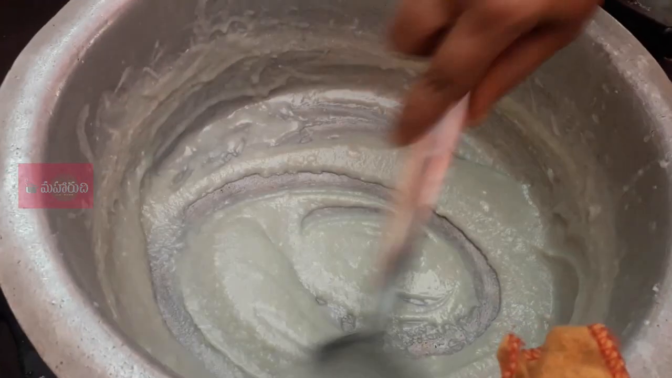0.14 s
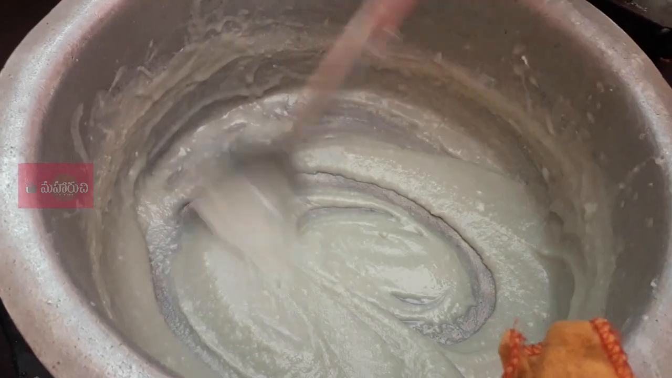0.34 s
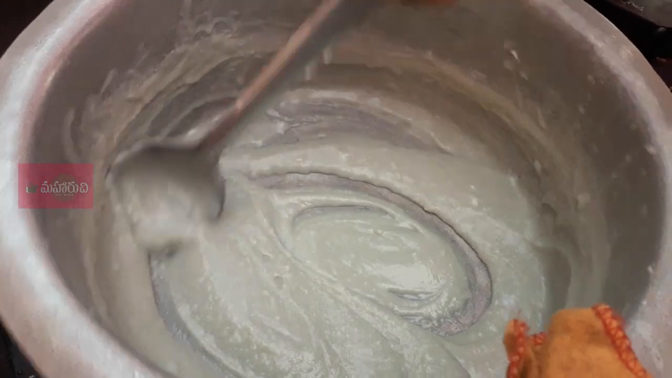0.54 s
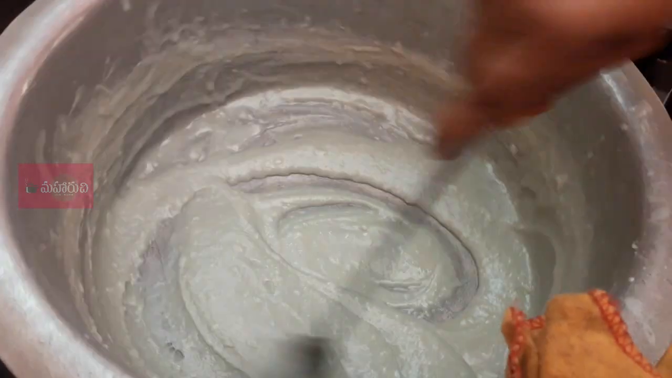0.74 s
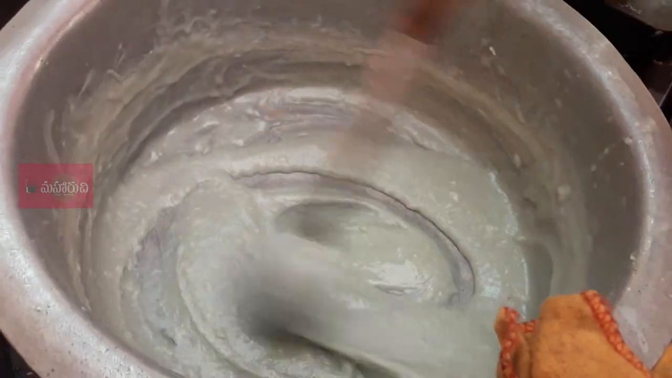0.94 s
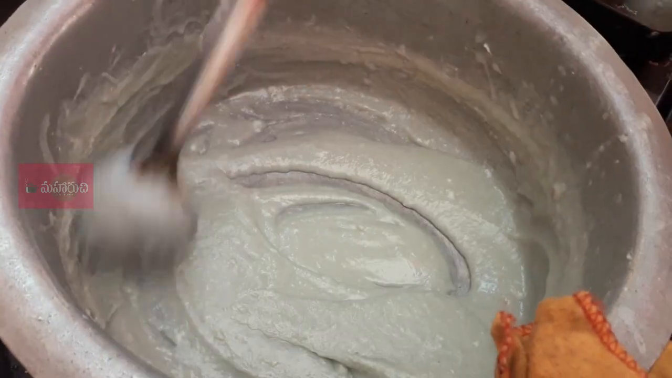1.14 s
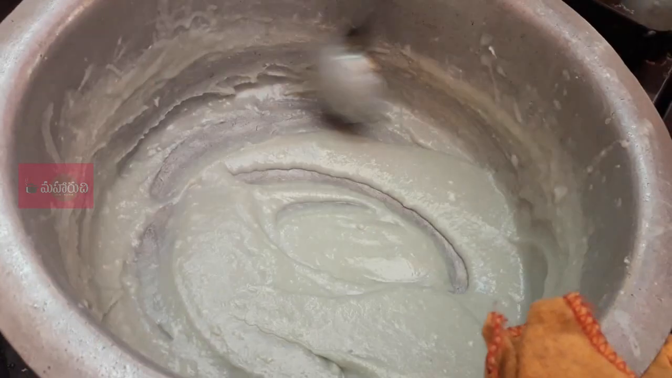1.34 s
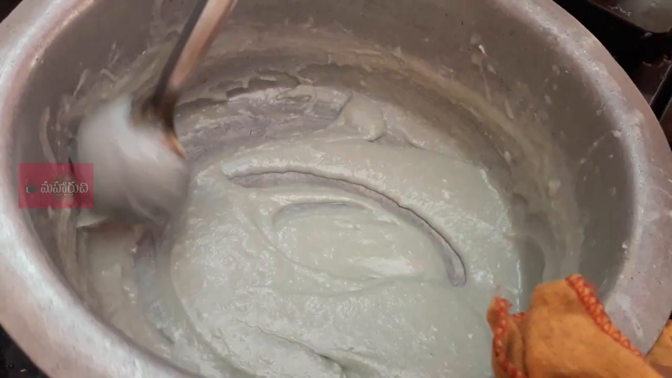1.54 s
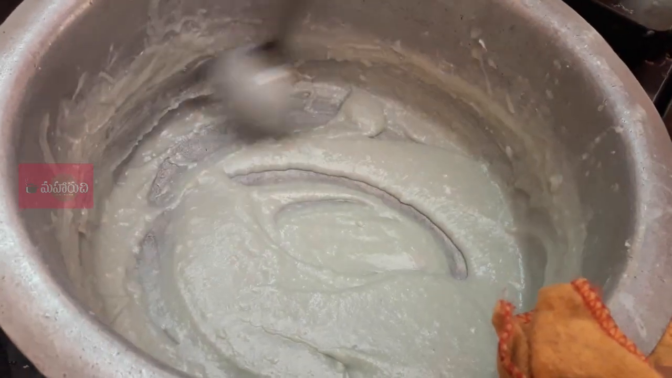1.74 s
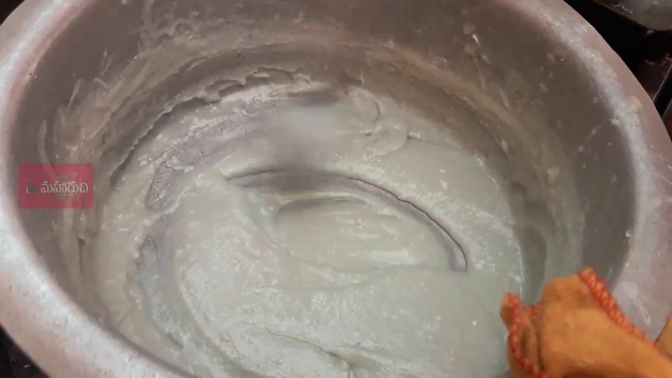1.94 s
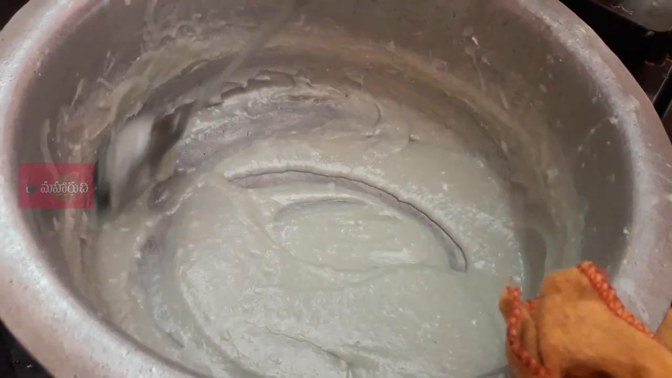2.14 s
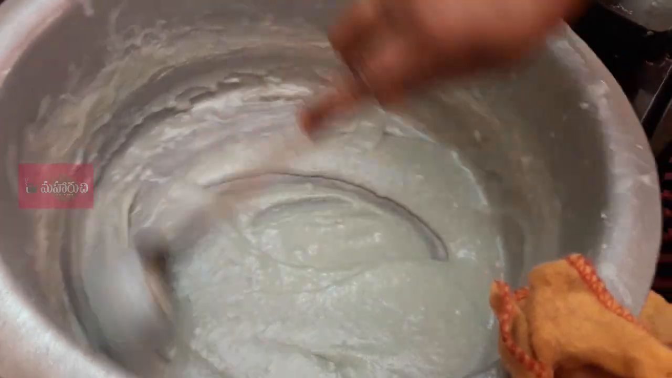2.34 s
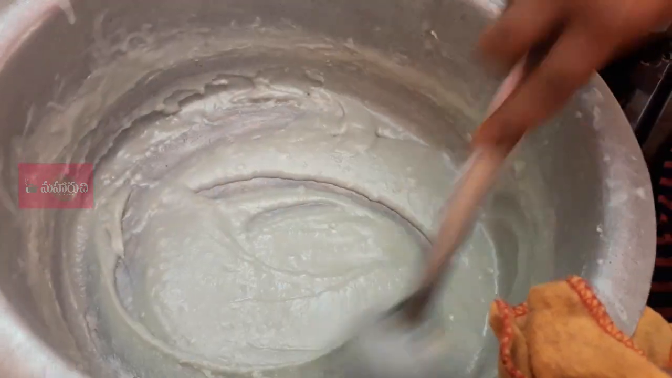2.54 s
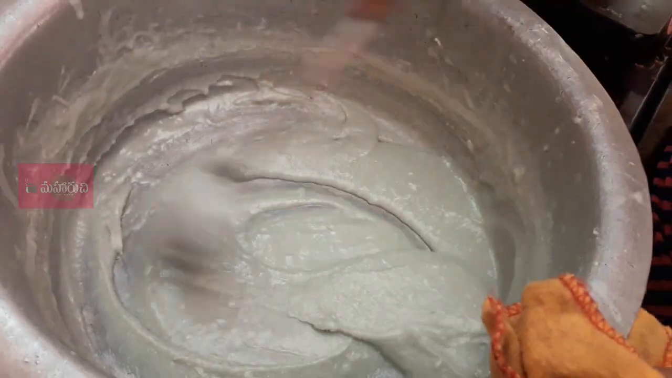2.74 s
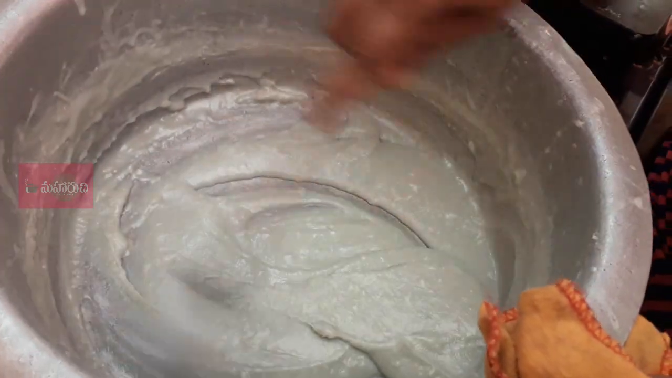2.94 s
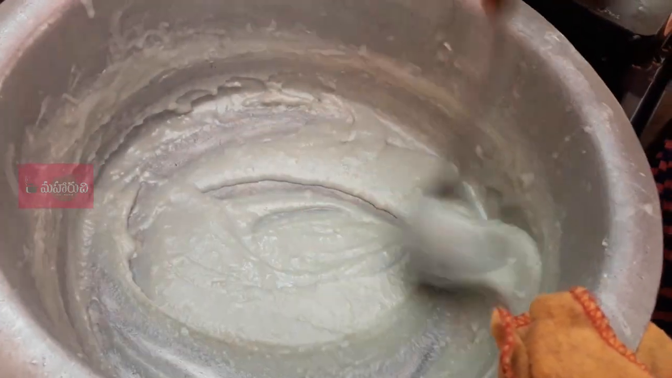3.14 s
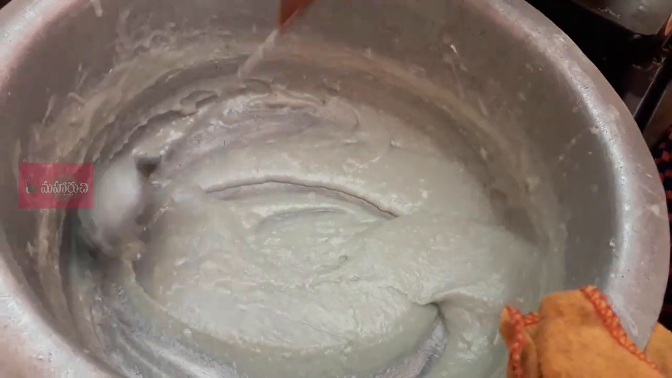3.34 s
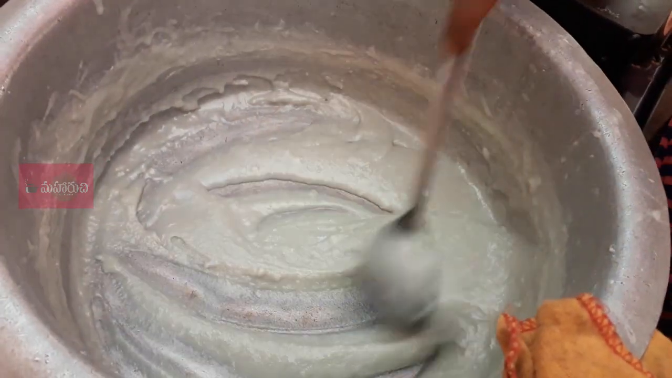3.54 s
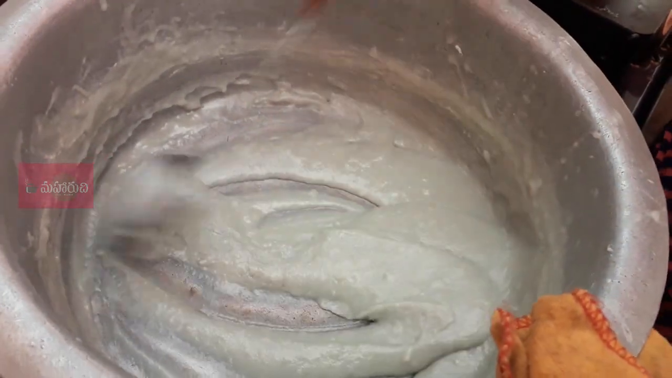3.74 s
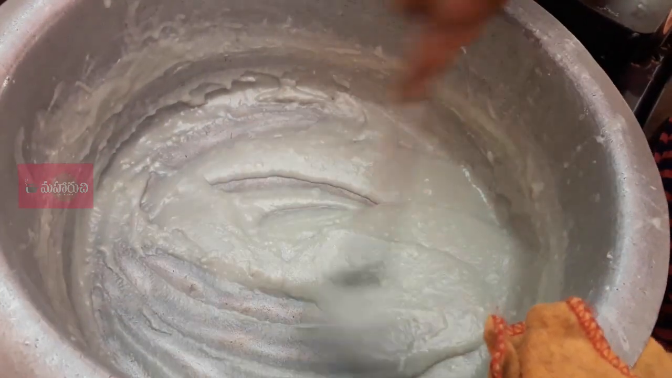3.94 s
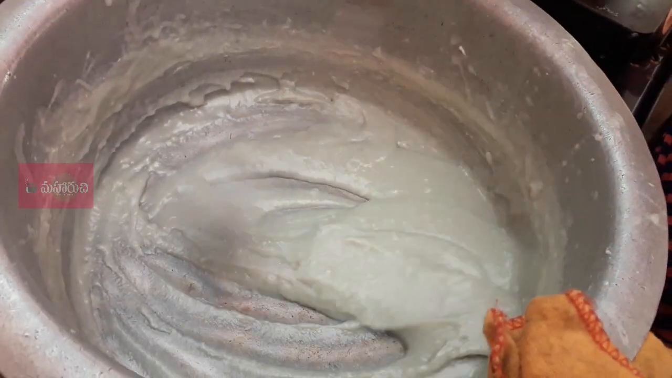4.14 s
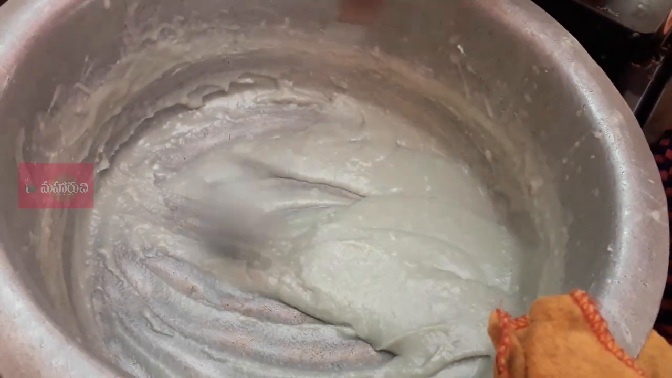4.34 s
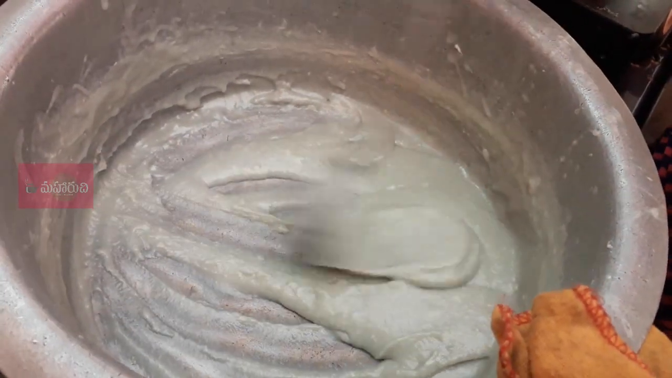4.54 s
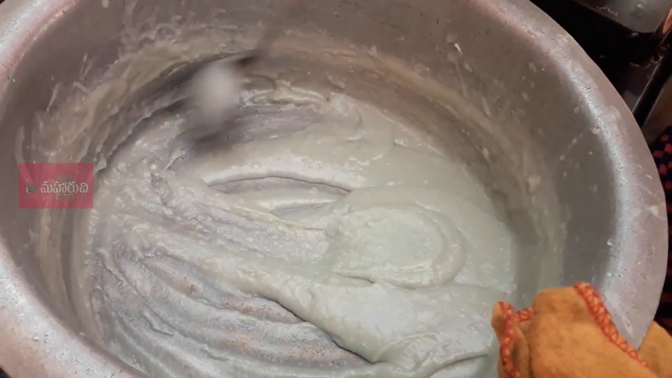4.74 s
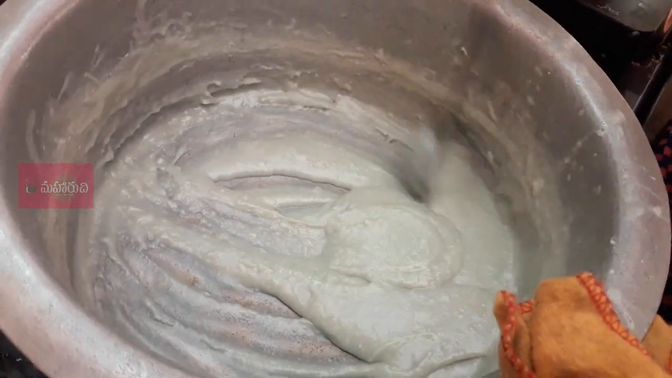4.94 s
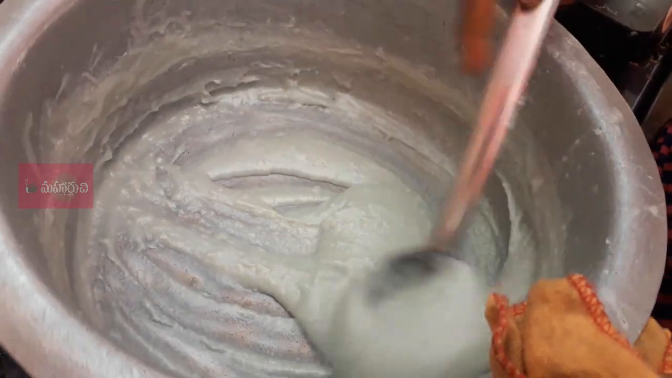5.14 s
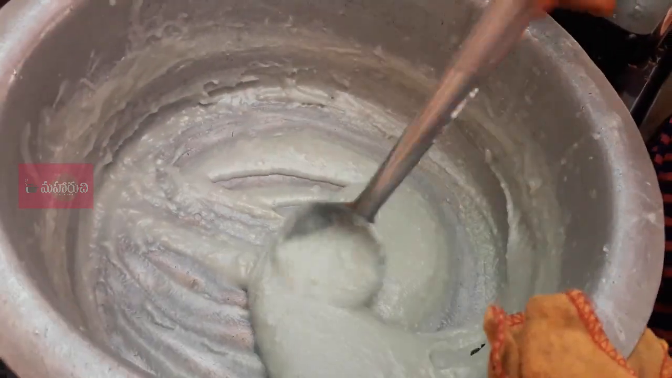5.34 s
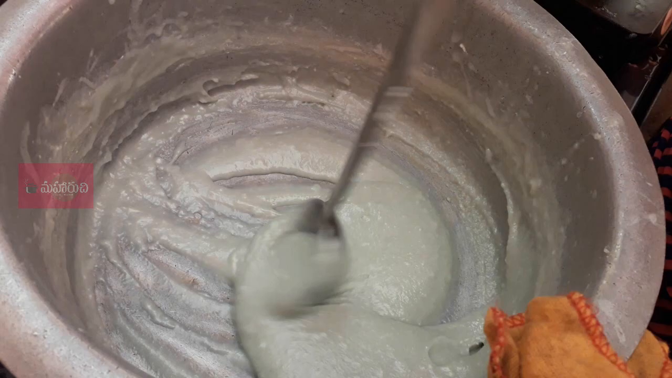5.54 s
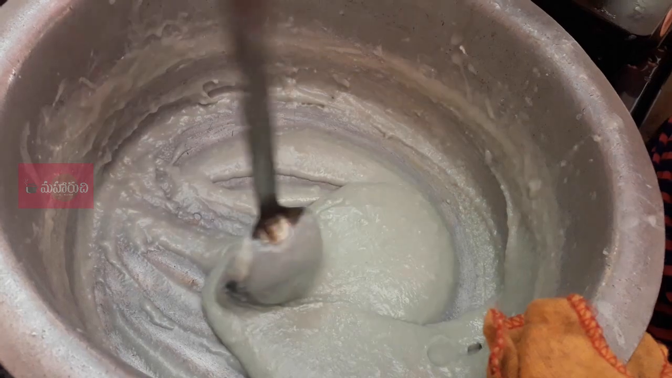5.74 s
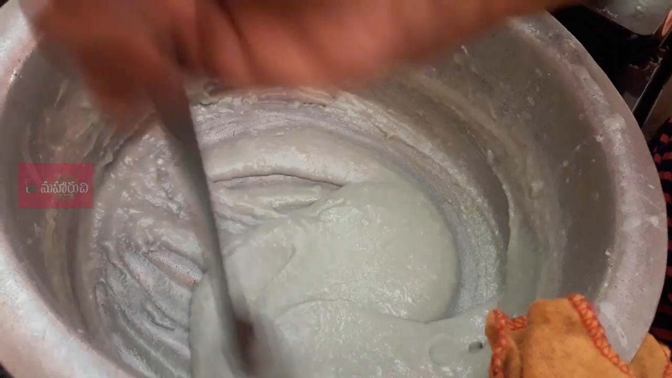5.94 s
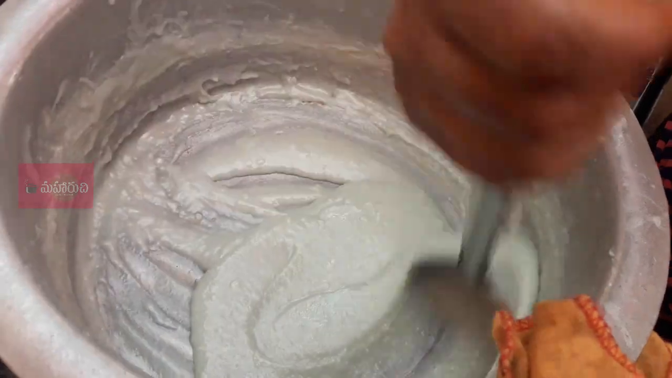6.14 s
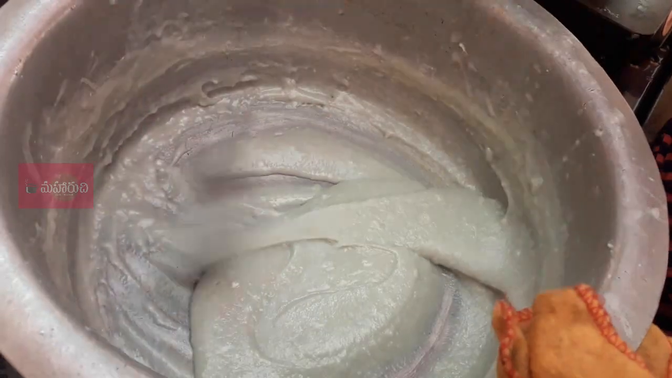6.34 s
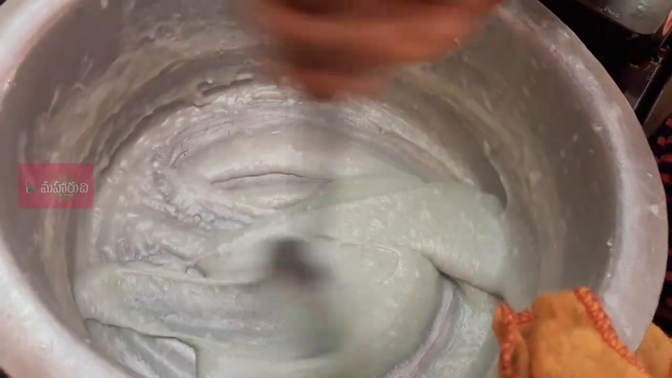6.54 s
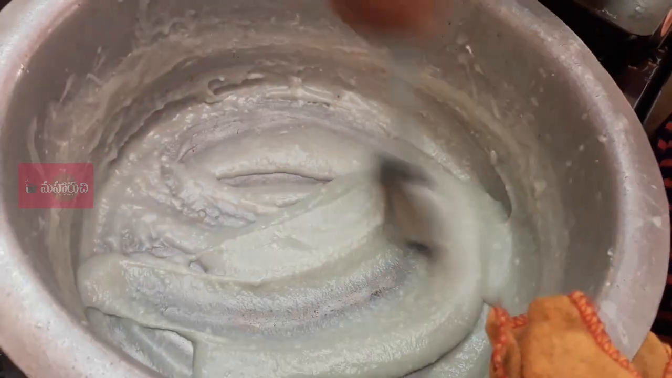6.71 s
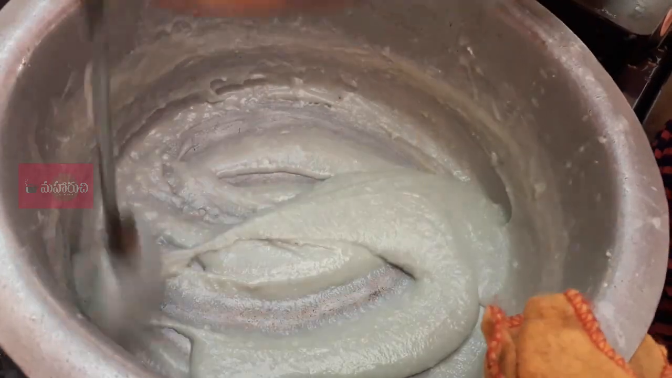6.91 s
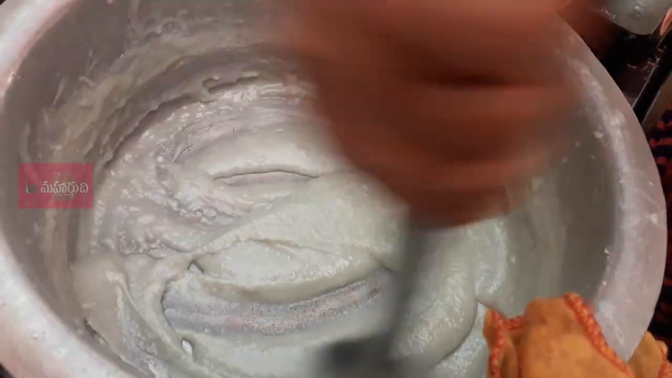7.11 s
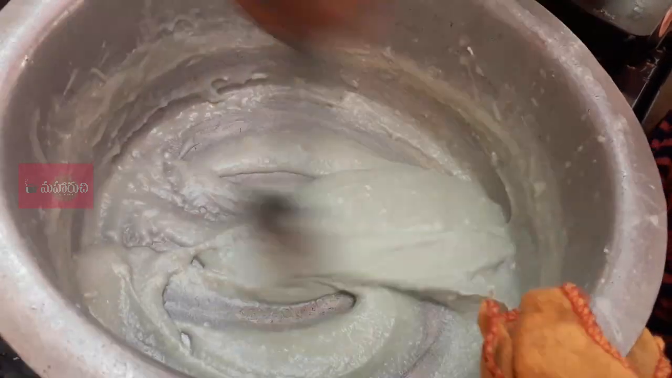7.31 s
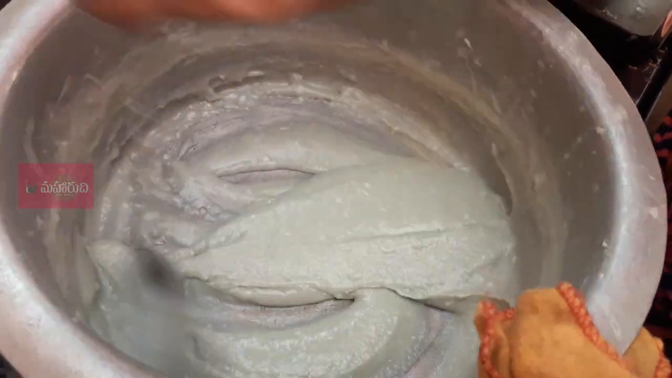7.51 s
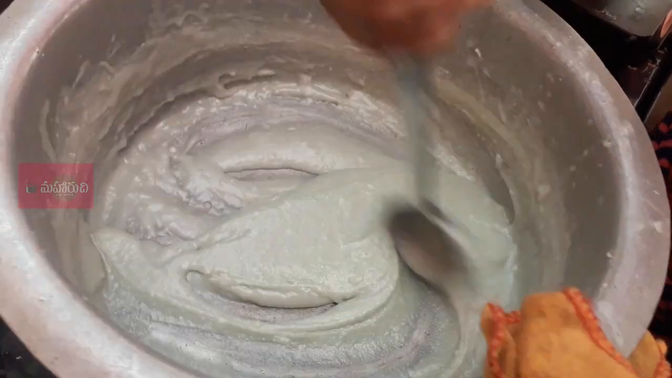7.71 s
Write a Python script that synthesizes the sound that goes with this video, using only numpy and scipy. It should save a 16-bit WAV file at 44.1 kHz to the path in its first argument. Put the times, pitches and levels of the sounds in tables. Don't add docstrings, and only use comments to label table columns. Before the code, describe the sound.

Close, gritty spoon strokes in a metal pot, each starting with a hard knock, turning to ringing clangs and a few wet slaps over quiet room air.

```python
import sys
import numpy as np
from scipy import signal
from scipy.io import wavfile
from scipy.ndimage import uniform_filter1d

SR = 44100
rng = np.random.default_rng(int(sys.argv[2]) if len(sys.argv) > 2 else 0)


def natural_amplitude(level_db):
    exponent = np.asarray(level_db, float) / 20
    return 10 ** exponent


def master_out(mix):
    frames = np.transpose(np.atleast_2d(mix))
    ceiling = np.clip(frames, -1, 1)
    pcm = np.round(ceiling * 32767).astype(np.int16)
    wavfile.write(sys.argv[1], SR, pcm)


N = 342657

# (pitch [Hz], level [dB], time to fade by 60 dB [s])
BELLY = [(197.2, -11, 0.18), (345, 6.5, 0.14), (377, -1, 0.055), (413, -16.5, 0.42), (503, -16.5, 0.22)]
# (pitch [Hz], level [dB], time to fade by 60 dB [s])
WALL = [(889, 0, .5), (967, -7, .12), (1015, -12, .2)]
# (pitch [Hz], level [dB], time to fade by 60 dB [s])
RIM = [(1211, -4, .35), (1380, -5, .25), (1433, -5, .22), (1727, -4, .2), (1845, -7, .18), (2101, -12, .28),
       (2236, -12, .25), (2401, -13, .35), (2575, -7, .2), (2912, -12, .2), (3129, -12, .22),
       (3430, -7, .27), (3571, -7, .25), (3741, -10, .28), (4041, -14, .2), (4883, -14, .2),
       (5301, -13, .2), (5916, -17, .22)]
# (pitch [Hz], level [dB])
GRIT = [(35, -64), (60, -32), (252, -6), (412, -2.5), (691, -13), (1400, -10.5), (2800, -14.5),
        (3650, -11.5), (4400, -13.5), (5300, -11), (12200, -22.5), (15400, -37), (16500, -126)]


def evened(x):
    return x / np.sqrt(np.mean(x ** 2, -1, keepdims=True) + 1e-20)


def peaked(x):
    return x / np.sqrt(uniform_filter1d(x ** 2, 176).max())


def read(points, hz):
    f, value = np.transpose(points)
    return np.interp(np.log(hz + 1), np.log(f + 1), value)


def add(mix, s, sound):
    part = mix[round(s * SR):][:len(sound)]
    part += sound[:len(part)]


def coloured(x, points):
    half = np.log(natural_amplitude(read(points, np.fft.rfftfreq(2048, 1 / SR))) + 1e-5)
    full = np.r_[half, half[-2:0:-1]]
    taps = np.fft.ifft(np.exp(np.conj(signal.hilbert(full)))).real
    return signal.oaconvolve(x, taps[:1024])[:len(x)]


def bands(x):
    splits_hz = [165, 650, 1170, 6500, 16000]
    parts = []
    for edges in zip(splits_hz, splits_hz[1:]):
        parts.append(signal.sosfilt(signal.butter(3, edges, "band", fs=SR, output="sos"), x))
    return np.array(parts)


def ring(modes, t, spread_db, speed=1.0):
    hz, db, t60 = np.transpose(modes)[:, :, None]
    luck, turn = rng.standard_normal((2, len(modes), 1))
    fade = natural_amplitude(db + spread_db * luck - 60 * speed * t / t60)
    return (fade * np.sin(2 * np.pi * hz * t + turn)).sum(0)


def drift(rate_hz, count):
    steps = rng.standard_normal((count, 2000))
    lowpass = signal.butter(1, np.clip(rate_hz, .5, 100), fs=2000 * SR / N, output="sos")
    smooth = evened(signal.sosfiltfilt(lowpass, steps))
    return np.array([np.interp(np.linspace(0, 1999, N), np.arange(2000), row) for row in smooth])


def resonate(x, hz, width):
    turn, r = np.exp(2j * np.pi * np.cumsum(hz) / SR), np.exp(-np.pi * width / SR)
    return 2 * (turn * signal.lfilter([1 - r], [1, -r], x / turn)).real


def patchy(x, depth_db):
    hz, t, z = signal.stft(x, SR, nperseg=512, noverlap=384)
    patches = rng.standard_normal(z.T.shape).T
    patches = uniform_filter1d(uniform_filter1d(patches, size=4, axis=0), size=14, axis=1)
    depth_db = depth_db / (1 + hz[:, None] / 8000)
    return signal.istft(z * natural_amplitude(depth_db * patches / patches.std()), nperseg=512, noverlap=384)[1][:len(x)]


def air():
    # (pitch [Hz], level [dB])
    air_colour = [(30, -26), (55, -22), (80, 2.5), (130, -5.5), (205, 2), (270, -9.5), (350, -3),
                  (550, -13.5), (1000, -6), (1400, -14.5), (3500, -14.5), (5200, -15), (7000, -22),
                  (12300, -24.5), (16500, -45)]
    rest_db = -5 * np.exp(-((np.arange(N) / SR - 5.52) / 0.21) ** 2)
    return natural_amplitude(-53 + rest_db) * evened(coloured(rng.standard_normal(N), air_colour))


def strokes():
    # (touch [s], full pressure [s], lift [s], pressure [dB], pitch under the spoon [Hz])
    scrapes = [(.63, .704, 0.87, -37, 3700), (1.71, 1.8, 1.813, -23, 3750), (2.32, 2.38, 2.43, -36.5, 1970),
               (2.42, 2.5, 2.574, -29.5, 1300), (2.975, 3.03, 3.1, -21, 2010),
               (3.425, 3.49, 3.539, -22.5, 1390), (3.87, 3.955, 4.02, -20, 1690),
               (4.315, 4.38, 4.395, -21, 1420), (4.735, 4.745, 4.81, -29, 3740),
               (5.9, 5.964, 6.05, -35.5, 3160), (6.06, 6.13, 6.21, -35, 2830),
               (6.485, 6.525, 6.65, -31, 2700), (6.99, 7.01, 7.08, -33.5, 2650),
               (7.11, 7.14, 7.185, -28, 5050)]
    # (touch [s], bite [s], pressure [dB], pitch under the spoon [Hz])
    skids = [(.01, 0.071, -38, 3330), (0.137, 0.17, -39, 3800), (0.282, 0.39, -57.5, 3000),
             (.5, 0.588, -50.5, 2050), (1.245, 1.25, -22, 3700), (1.268, 1.326, -19.5, 4150),
             (1.576, 1.64, -44, 1410), (2.2, 2.33, -44, 2300), (2.543, 2.61, -25, 3850),
             (2.94, 2.96, -28, 2430), (4.266, 4.28, -31, 1399), (4.395, 4.453, -23, 1480),
             (4.1, 4.215, -55, 2000), (4.83, 4.946, -26, 5030), (5.1, 5.15, -59, 4000),
             (6.3, 6.444, -54.5, 2366), (6.832, 6.9, -46, 1800), (6.935, 6.93, -25, 1750),
             (7.286, 7.405, -48.5, 4000), (7.472, 7.48, -28, 3500), (7.57, 7.64, -32.5, 1940)]
    # (time [s], bare metal [0-1], milk heaped ahead [0-1], belly pitch with the milk pushed aside [Hz])
    place = [(0, 1, 1, 436), (.2, 0.94, 0.67, 367), (.7, 0.23, 0.66, 388), (.9, 1, 1, 407),
             (1.3, 0.44, .5, 377), (1.6, 0.03, 0.2, 375), (1.8, 0.5, 0.2, 379), (2.3, 0.47, 0.04, 364),
             (2.5, 0.97, 0.16, 448), (3.0, 0.16, 0.3, 467), (3.5, 0.31, 0.56, 398), (4.0, 0.22, 0.24, 417),
             (4.45, 0.34, 0.6, 490), (4.85, 0.36, 0.47, 410), (6.05, 0.52, 0.3, 413),
             (6.6, 0.48, 0.55, 433), (7.0, 0.6, 0.3, 399.9), (7.65, 0, 0, 450)]
    # (level [dB], gain on bare metal [dB], gain by heaped milk [dB])
    middle = (0, 0, 0)
    boom = (-14.5, 1.6, 13.2)
    wall_ring = (-15.5, 16.5, 0.61)
    fine = (-7.5, 3.85, -1.1)
    # (first touch [dB], fast fade [dB/s], after-sound [dB], slow fade [dB/s])
    shapes = [(-0.2, 252, -26.5, 57), (7.5, 184, -22, 55), (4.5, 257, -30.5, 54), (2.5, 256, -37, 85)]
    touch_db, ease_in_s = -13, .014
    belly_rest_hz, push_s = 355, 0.077

    t = np.arange(0, N / SR + .002, .002)
    rows = scrapes + [(start, bite, bite, db, hz) for start, bite, db, hz in skids]
    touch, full, lift, press_db, spot_hz = np.transpose(rows)[:, :, None]
    short = np.clip((full - t) / np.maximum(full - touch, .005), 0, 1)
    rise_db = press_db + touch_db * short - 60 * np.maximum(touch - t, 0) / ease_in_s
    gone = np.maximum(t - lift, 0)
    s, bare, heap, open_hz = np.transpose(place)
    gains = []
    for level, shape in zip((middle, boom, wall_ring, fine), shapes):
        db, bare_db, heap_db = level
        first_db, fast, after_db, slow = shape
        fade = natural_amplitude(-fast * gone) + natural_amplitude(after_db - slow * gone)
        power = (natural_amplitude(rise_db + first_db * short) * fade) ** 2
        place_gain = natural_amplitude(np.interp(t, s, db + bare_db * bare + heap_db * heap))
        gains.append(place_gain * np.sqrt(power.sum(0)))
    share = power / (power.sum(0) + 1e-30) + 1e-9
    share = share / share.sum(0)
    pushed = (share * np.clip((t - touch) / push_s, 0, 1)).sum(0)
    belly_hz = belly_rest_hz + (np.interp(t, s, open_hz) - belly_rest_hz) * pushed
    curves = (*gains, belly_hz, (share * spot_hz).sum(0))
    return [np.interp(np.arange(N) / SR, t, curve) for curve in curves]


def woken(slips, modes, weights):
    out = np.zeros(N)
    for (hz, db, t60), weight in zip(modes, weights):
        r = np.exp(-np.log(1000) / (.18 * t60 * SR))
        tone = signal.lfilter([1], [1, -2 * r * np.cos(2 * np.pi * hz / SR), r * r], slips)
        out += evened(tone) * weight
    return out


def drag():
    press, boom, ringing, grit, belly_hz, spot_hz = strokes()
    strength = natural_amplitude(3.47 * np.minimum(rng.exponential(1, N), 4.2))
    slips = (rng.random(N) < 9000 / SR) * rng.choice([-1., 1.], N) * strength
    slips *= natural_amplitude(1.1 * drift(27, count=1)[0])
    low, wall, middle, treble = evened(bands(patchy(coloured(slips, GRIT), depth_db=3.5)))
    luck = natural_amplitude(3 * drift(12, count=len(RIM + BELLY + WALL)))

    near = [np.exp(-(np.log2(hz / spot_hz) / .33) ** 2) for hz, db, t60 in RIM]
    clear = np.minimum(1420 / spot_hz, 1)
    middle = evened(middle + .55 * clear * evened(woken(slips, RIM, near * luck[:len(RIM)])))
    hollow = resonate(resonate(middle, spot_hz, 420), spot_hz, 420)
    middle = evened(middle + 0.2 * clear * evened(hollow))

    wall = evened(wall + 0.86 * evened(bands(woken(slips, WALL, luck[-len(WALL):]))[1]))
    low = low + .5 * evened(bands(woken(slips, BELLY, luck[len(RIM):]))[0])
    milky = resonate(resonate(slips, belly_hz, 113), belly_hz, 110)
    low = evened(low + 1.1 * evened(milky))
    return press * middle + boom * low + ringing * wall + grit * treble


def knock(s, blow_db, boom_db, wall_db, edge_db, t60, snap_db, rise, rim_db):
    # (pitch [Hz], level [dB])
    crack_colour = [(59, -52), (100, 4), (778, 1), (1510, -3), (2360, -10), (3700, -2.5), (4390, -4),
                    (5320, -11), (12200, -30.5), (16500, -46)]
    t, t60 = np.arange(SR // 3) / SR, np.clip(t60, .03, .5)
    snap, rattle = rng.standard_normal((2, len(t)))
    crack = natural_amplitude(snap_db - 60 * t / 0.013) * snap + natural_amplitude(-60 * t / t60) * rattle
    low, wall, middle, treble = bands(coloured(crack * (1 - np.exp(-t / rise)), crack_colour))
    body = peaked(.5 * wall + middle) + natural_amplitude(rim_db) * peaked(ring(RIM, t, 3, speed=.1 / t60))
    swell = 1 - np.exp(-t / 0.0013)
    boom = peaked(swell * ring(BELLY, t, 2.6) + 0.59 * peaked(low))
    thud = np.sin(2 * np.pi * 150 * t) * swell * natural_amplitude(-60 * t / 0.048)
    muffled = natural_amplitude(-60 * np.maximum(t - .13, 0) / 0.13)
    wall_ringing = peaked(swell * muffled * ring(WALL, t, 1.5))
    parts = body + natural_amplitude(edge_db) * peaked(treble) + natural_amplitude(boom_db) * (boom + natural_amplitude(-14.0) * thud)
    return s, natural_amplitude(blow_db - 12.5) * (parts + natural_amplitude(wall_db) * wall_ringing)


def kitchen(x):
    # (pitch [Hz], time to fade by 60 dB [s])
    echo_times = [(200, 0.48), (1000, 0.48), (4000, 0.35), (14000, 0.25)]
    out, at = np.zeros(N), np.arange(200, SR // 2 - 20, 20)
    for k in range(4):
        taps = np.zeros(SR // 2)
        taps[at + rng.integers(0, 20, len(at))] = rng.choice([-1., 1.], len(at))
        hz, t, z = signal.stft(taps, SR, nperseg=256)
        tail = signal.istft(z * natural_amplitude(-60 * t / read(echo_times, hz)[:, None]), SR, nperseg=256)[1]
        share = np.maximum(np.cos(2 * np.pi * (np.arange(N) / SR / .23 + k / 4)), 0)
        out += signal.fftconvolve(x * share, tail / np.linalg.norm(tail))[:N]
    return out


def squeal(start, end, hz, db, waver_hz):
    t = np.arange(round((end - start) * SR)) / SR
    a, b = rng.standard_normal((2, SR))
    fuzz = signal.lfilter([1], [1, -np.exp(-np.pi * waver_hz / SR)], a + 1j * b)[-len(t):]
    fuzz = 1.4 + fuzz / np.sqrt(np.mean(abs(fuzz) ** 2))
    tone = evened((fuzz * np.exp(2j * np.pi * hz * t)).real)
    return start, natural_amplitude(db) * tone * signal.windows.tukey(len(t), .6)


def jingle(s, db):
    # (pitch [Hz], level [dB], time to fade by 60 dB [s])
    bangle = [(7150, -19, 0.14), (8400, -1, 0.33), (8330, 34, 0.98), (10900, -29, 0.16), (11800, -22, 0.55)]
    t = np.arange(SR // 2) / SR
    burst = rng.standard_normal(len(t)) * (1 - np.exp(-t / .003)) * natural_amplitude(-60 * t / .08)
    tick = bands(coloured(burst, GRIT))[3]
    return s, natural_amplitude(db - 4) * (peaked(tick) + natural_amplitude(-19) * peaked(ring(bangle, t, 3, speed=1.3)))


def snag(s, db, hz, t60, noise):
    t = np.arange(len(noise)) / SR
    shape = (1 - np.exp(-t / 0.00082)) * natural_amplitude(-60 * t / np.clip(t60, .02, .25))
    tone, width = np.full(len(t), float(hz)), min(300, .3 * hz)
    rasp = resonate(resonate(np.sign(noise), tone, width), tone, width)
    sung = shape * (np.sin(2 * np.pi * hz * t) + .6 * evened(rasp))
    grit = natural_amplitude(-9) * min(hz / 1500, 1) ** 2 * peaked(shape * noise)
    return s, natural_amplitude(db - 7.5) * (peaked(sung) + grit)


def plop(s, db, hz, length):
    u = np.arange(round(2 * length * SR)) / (length * SR)
    return s, natural_amplitude(db) * 4.1 * u * np.exp(-2.5 * u ** 1.7) * np.sin(2 * np.pi * hz * length * u)


def add_hard_blows(pot):
    # (time [s], level [dB])
    blow_times = [
        (6.9336, -17.5),
        (7.462, -16),
    ]
    # (pitch [Hz], level [dB], time to fade by 60 dB [s])
    low_blow = [(1211, 0.5, 0.46), (1360, -2, 0.35), (1696, -4, 0.22), (1814, -6, 0.19), (2126, -8, 0.095),
                (2369, -6, 0.25), (2630, -10, 0.51), (2885, -7, 0.22), (3117, -19, 0.55), (4037, -7, 0.19),
                (5652, -15, 0.13)]
    # (pitch [Hz], level [dB], time to fade by 60 dB [s])
    high_blow = [(1215, -4, 0.088), (1727.2, -4, 0.14), (1841, -5, 0.13), (2422, -2, 0.084),
                 (2573, 0, 0.18), (2912, -5, 0.2), (3429, -6, 0.27), (3488, -8, 0.1), (4683, -19, 0.24),
                 (4860, -5, 0.15), (5916, -14, 0.29), (6406, -13, 0.15), (6799, -22, 0.37)]
    for (s, db), modes in zip(blow_times, (low_blow, high_blow)):
        add(pot, s, natural_amplitude(db) * peaked(ring(modes, np.arange(SR // 2) / SR, 0)))


def scene():
    # (time [s], blow [dB], belly boom [dB], wall ring [dB], edge sharpness [dB])
    landings = [(0.1456, -22, 2, -25, 0.5), (0.4183, -39.5, 9.5, -7, 5), (0.521, -34.5, -5, -26, 4),
                (0.5894, -29.5, 2, -23, -4), (1.1236, -24.5, 2, -18, 6.5), (1.1639, -30.5, -26, -34, 22),
                (1.2337, -24, -4, -30, 10), (1.5758, -25, 9, -14, -11), (2.0944, -26, -13, -21, 8),
                (2.1934, -9.5, -2.5, -32, -0.5), (2.9245, -6.5, -7, -17, -9), (3.4148, -1.5, -6, -21, -2),
                (3.8566, -1.5, -5, -21.5, -1), (4.2636, -3, -6, -27, -0.5), (4.7238, -0.5, -7.5, -22, -1),
                (5.098, -25, -14, -18, 1), (6.4774, -14, -1.5, -17, -3), (2.9766, -13, -9, -22, 1),
                (0.558, -45, -20, -25, 9)]
    # (time [s], blow [dB], belly boom [dB], wall ring [dB], edge sharpness [dB])
    clangs = [
        (0.8352, -16.5, 8, -1.5, 2),
        (1.2531, -5, 1.5, -6.5, 1.5),
        (1.7301, -6.5, -3.5, -10, -3.5),
        (6.0123, -10, 3.5, 0, -0.5),
        (6.933, 0.5, -14, 0, -13),
        (7.4617, -2.5, -13, -11.5, -0.5),
    ]
    # (time [s], blow [dB], belly boom [dB], wall ring [dB], edge sharpness [dB])
    catches = [(0.0367, -22.5, 6, -5.5, 5.5), (0.184, -26, -11, -26, 1.5), (0.7466, -21.5, -21, -24, 4),
               (0.7674, -17, 9.5, -10, -2.5), (1.202, -26.5, -8, -14, 3), (1.697, -36, -6, -17, 9),
               (2.3714, -24.5, -3, -13, -16), (2.4856, -15, -28, -3, -20), (2.5692, -12, -19, -21, -19),
               (2.6096, -14, -6.5, -18, -4), (3.4993, -25, 8, -27, -15), (4.7893, -17.5, 3.5, -21, -25),
               (5.1605, -37, -5, -14, -21), (7.1461, -21.5, -31, -9, 5), (7.6365, -17, -25, -21, -20),
               (7.644, -17, -24, -34, -20), (1.806, -26, -23, -13, 10)]
    # (time [s], level [dB], belly pitch
    # [Hz], length [s])
    plops = [(5.092, -42, 419, 0.031), (5.122, -38, 420, 0.014), (5.161, -35.5, 410, 0.011),
             (5.263, -43, 350, 0.017), (6.287, -36, 336, 0.015), (7.272, -35.5, 345, 0.012),
             (7.333, -35.5, 379.9, 0.013), (7.41, -49, 330, 0.03), (4.799, -34, 386, 0.019),
             (4.871, -32, 390, .025), (6.016, -16, 393, 0.04), (6.044, -20, 480, 0.032),
             (6.013, -20, 520, 0.0091), (4.728, -25, 240, 0.011), (6.019, -20.5, 431, 0.027),
             (6.931, -14.5, 361, 0.046)]
    # (time [s], level [dB])
    jingles = [
        (0.4324, -47),
        (2.179, -37),
        (4.6385, -50),
        (5.0924, -39),
        (5.2979, -48.5),
        (5.4294, -57),
        (5.5821, -49.5),
        (5.5994, -54),
        (5.7545, -54),
    ]
    # (start [s], end [s], pitch [Hz], level [dB], waver [Hz])
    squeals = [(.05, .6, 4400, -64, 30), (.92, 1.12, 12100, -68, 60), (1.02, 1.12, 4400, -64, 30),
               (6.25, 6.48, 12000, -72, 60), (1.92, 2.32, 4900, -59, 15), (4.05, 4.3, 3478, -58, 15),
               (4.47, 4.8, 3478, -56, 35), (4.52, 4.86, 3042, -48, 14), (4.95, 5.92, 4915, -56, 45),
               (5.75, 5.93, 6050, -65, 60), (5.3, 5.5, 9050, -72, 40), (5.1, 5.5, 12200, -74, 60),
               (5.4, 5.85, 1110, -71, 8), (5.52, 5.66, 856, -58, 15)]
    # (time [s], level [dB], pitch [Hz], time
    # to fade by 60 dB [s])
    singing_patches = [(.668, -31, 3700, .06), (.705, -28, 3700, .1), (.7302, -30, 3640, .05), (.82, -28, 1430, .05),
                       (1.2396, -19, 4240, .06), (1.265, -13, 4080, .04), (1.315, -17, 3820, .08),
                       (1.3267, -11, 5350, 0.044), (1.342, -14, 5400, .05), (1.354, -19, 3990, .05),
                       (1.7065, -29, 3680, .05), (1.717, -23, 4090, .05), (1.8043, -18, 4180, 0.055),
                       (3.0041, -17, 5100, .06), (3.005, -18, 3650, .12), (3.04, -15, 2240, .07),
                       (3.0876, -13.5, 1790, .1), (3.1, -22, 5200, .05), (3.47, -23, 1390, .06),
                       (3.9105, -18, 1950, .07), (3.945, -17, 1600, 0.062), (3.956, -14, 1390, 0.066),
                       (3.97, -16, 1994, .08), (3.997, -15, 3370, .08), (4.3326, -22, 1450, .06),
                       (4.3535, -25, 1460, 0.089), (4.371, -13, 1358, 0.099), (4.7915, -20, 5310, .06),
                       (4.9067, -24, 1481, .06), (4.9327, -18, 5100, .06), (6.5256, -25, 2100, 0.064),
                       (6.6273, -27, 2520, .05), (6.6393, -24, 2990, .06), (6.6957, -33, 5800, .04),
                       (7.1262, -20, 5250, .06), (7.127, -20, 967, .08), (7.1462, -19, 4760, .1),
                       (7.175, -24, 2700, 0.065), (7.6196, -25, 3400, 0.091), (7.481, -15, 5200, .04),
                       (1.2528, -12, 5250, .04), (1.29, -15, 1080, .09), (1.329, -18, 7650, .05),
             (1.331, -18, 3620, .06), (1.333, -21, 1080, 0.064), (1.5755, -37, 1360, 0.18),
             (1.5757, -38, 2630, .08), (1.5757, -39, 3230, .12), (1.731, -15, 1030, 0.043),
             (1.731, -16, 5340, .04), (1.778, -20, 1034, .08), (1.803, -15, 5300, .06),
             (1.796, -19, 2750, 0.14), (1.806, -17.5, 1018, .08), (2.1935, -23, 1000, .06),
             (2.1942, -27.5, 1513, 0.11), (2.1937, -28, 3240, 0.086), (2.478, -18, 860, 0.088),
             (2.595, -19, 3700, .07), (2.9245, -19, 1400, .04), (3.045, -15, 506, 0.11),
             (3.0, -17, 498, 0.12), (3.415, -17, 5170, 0.027), (3.415, -18, 1900, .05),
             (3.499, -13, 1323, .07), (3.974, -19, 4650, .05), (3.977, -20, 3450, .05),
             (3.988, -16, 2950, .05), (4.002, -19, 4220, .05), (4.025, -20, 2070, .08),
             (4.05, -22, 498, 0.12), (4.264, -14, 336, .04), (4.264, -16, 3250, .04),
             (4.2723, -16, 1460, .04), (4.354, -17, 5740, .04), (4.378, -16, 5430, .05),
             (4.382, -14, 3900, .04), (4.428, -17, 500, 0.11), (4.435, -19, 5300, .05),
             (4.7242, -13.5, 5430, .06), (4.729, -18, 3560, .09), (6.0135, -18, 3630, 0.043),
             (6.9335, -14, 2200, .04), (6.95, -12, 1710, .07), (7.4618, -6, 3640, 0.044),
             (7.4615, -7.5, 5510, 0.037), (7.476, -15, 1681, .07), (7.466, -18, 350, .15),
             (6.48, -33, 75, 0.17)]

    hits, far = np.zeros((2, N))
    for row in landings:
        add(hits, *knock(*row, t60=0.088, snap_db=16.0, rise=0.00031, rim_db=-12.5))
    for row in clangs:
        add(hits, *knock(*row, t60=0.072, snap_db=7.5, rise=0.00043, rim_db=-2.0))
    for row in plops:
        add(hits, *plop(*row))
    for row in jingles:
        add(hits, *jingle(*row))
    for row in catches:
        add(hits, *knock(*row, t60=0.067, snap_db=0, rise=.002, rim_db=-12))
    for row in squeals:
        add(far, *squeal(*row))
    pot = hits + drag()
    add_hard_blows(pot)
    grit = bands(coloured(rng.standard_normal(100 * 6000), GRIT))[2:].sum(0).reshape(100, 6000)
    for row, noise in zip(singing_patches, grit):
        add(pot, *snag(*row, noise))
    return (pot + natural_amplitude(-12.5) * kitchen(pot) + air() + far)[None]


def roll_off(x):
    return signal.sosfilt(signal.butter(12, 16820, fs=SR, output="sos"), x)


def record(dry):
    x = signal.sosfilt(signal.butter(3, 52, "high", fs=SR, output="sos"), dry)
    rumble_band = signal.butter(2, [15, 50], "band", fs=SR, output="sos")
    x = x + natural_amplitude(-85) * evened(signal.sosfilt(rumble_band, rng.standard_normal(x.shape)))
    ceiling = .7 + .27 * np.tanh((abs(x) - .7) / .27)
    x = np.where(abs(x) > .7, np.sign(x) * ceiling, x)
    treble_limit = signal.firwin(255, 16450, window=("kaiser", 9), fs=SR)
    x = signal.oaconvolve(x, treble_limit[None], "same")
    return roll_off(x)


dry = scene()
out = record(dry)
master_out(out)
```